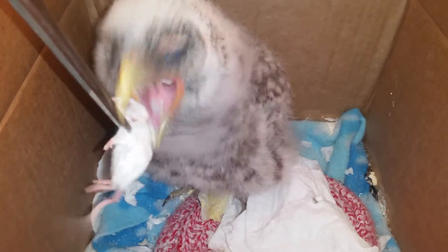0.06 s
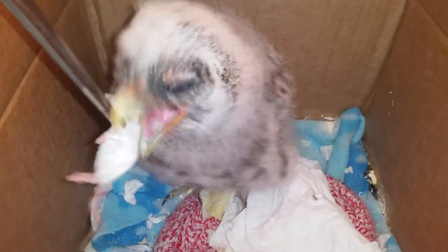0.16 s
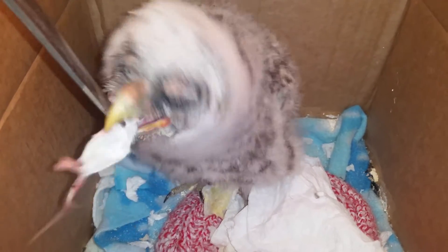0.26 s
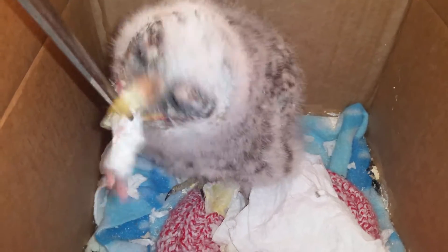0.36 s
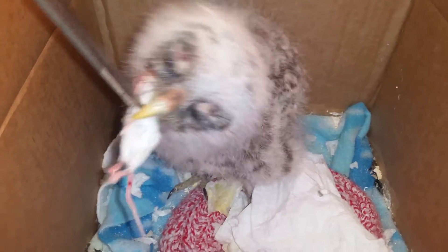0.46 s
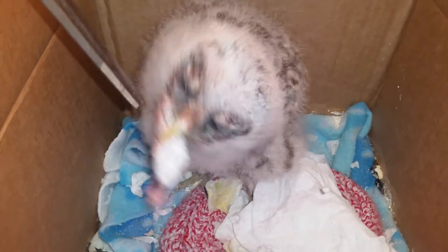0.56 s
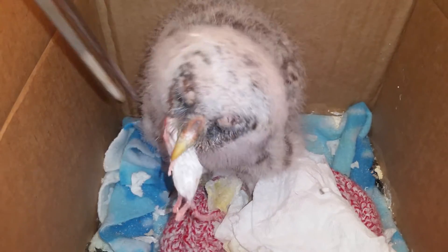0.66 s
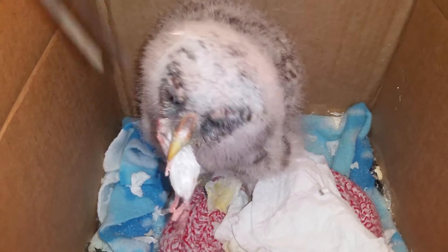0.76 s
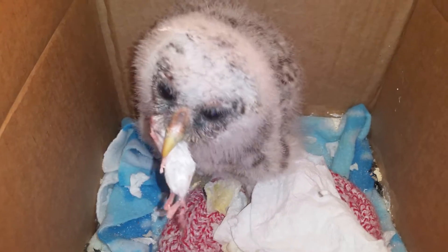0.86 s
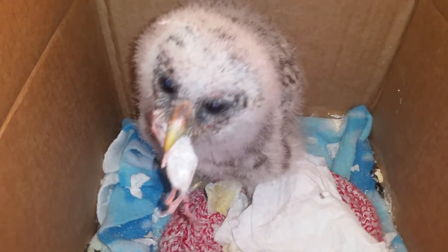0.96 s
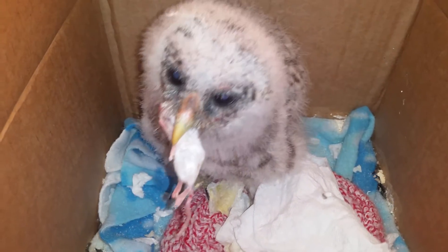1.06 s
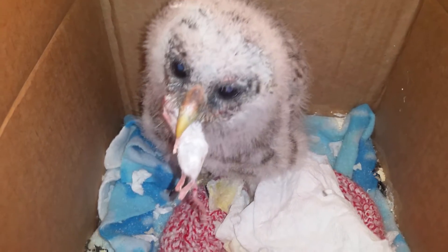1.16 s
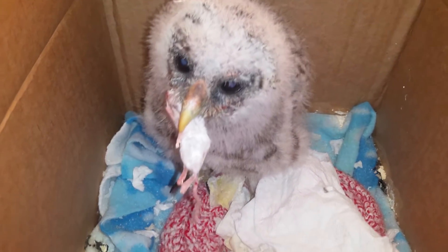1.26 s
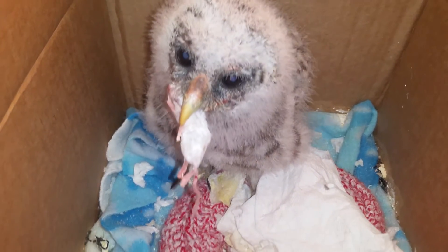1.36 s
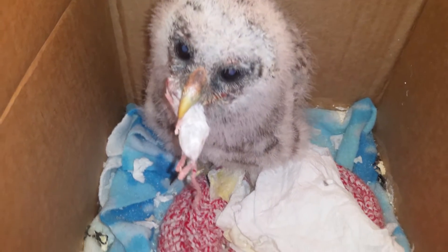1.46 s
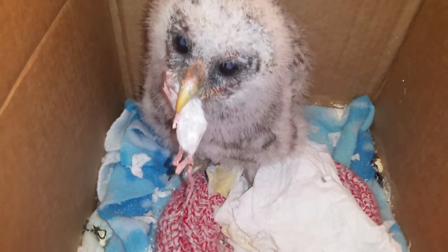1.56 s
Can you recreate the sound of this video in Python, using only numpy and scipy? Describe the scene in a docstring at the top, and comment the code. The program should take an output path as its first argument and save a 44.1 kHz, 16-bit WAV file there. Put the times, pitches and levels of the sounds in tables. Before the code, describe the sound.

One raspy, whistling owl chick screech in a quiet room, then bedding shuffles in its box

```python
"""A quiet room with a thin hiss; then an owl chick in a cardboard box gives one begging screech, close up.
The two sides of its syrinx are coupled oscillators: the lower flutters, then breaks into a rasp of
band-limited noise, while the upper climbs and falls away. Shaped noise hisses through the open beak.
Bumps ring the decaying modes of the box, and shuffling on the bedding is rustling noise over a low rumble."""
import sys
import numpy as np
from scipy import signal
from scipy.fft import rfft, irfft
from scipy.io import wavfile

SR = 44100
rng = np.random.default_rng(int(sys.argv[2]) if len(sys.argv) > 2 else 0)


def wav_out(sig):
    """Save sig, one row per channel (or a flat mono array), as 16-bit PCM at SR to the path in sys.argv[1]."""
    wavfile.write(sys.argv[1], SR, np.round(np.clip(np.atleast_2d(sig).T, -1, 1) * 32767).astype(np.int16))


N = 70560
T = np.arange(N) / SR
EDGE_S = 0.00076  # fade at each end of a gated layer


def undb(db):
    """Decibels to gain."""
    return 10 ** (np.asarray(db) / 20)


def unit(x):
    """Scale to rms 1."""
    return x / np.sqrt(np.mean(np.abs(x) ** 2))


def curves(table):
    """Each column after the time as a curve with straight lines between the rows."""
    rows = np.array(table, float)
    return [np.interp(T, rows[:, 0], column) for column in rows.T[1:]]


def gate(table):
    """Open from the first row of a table to the last, with soft edges."""
    opening = np.clip((T - table[0][0]) / EDGE_S + 1, 0, 1)
    closing = np.clip((table[-1][0] - T) / EDGE_S + 1, 0, 1)
    return opening * closing


def pan(x, left_right_db):
    """Place a sound by its left-right level difference, keeping its mean power."""
    gains = undb(np.array([[1], [-1]]) * left_right_db / 2)
    return x * gains / np.sqrt(np.mean(gains ** 2, axis=0))


def flicker(hz):
    """Complex noise of rms 1 whose spectrum falls steeply beyond a rate."""
    f = np.fft.fftfreq(N, 1 / SR)
    noise = rng.standard_normal(N) + 1j * rng.standard_normal(N)
    return unit(np.fft.ifft(np.fft.fft(noise) / (1 + (f / hz) ** 2) ** 1.435))


def walk(hz):
    """Random wandering with rms 1."""
    return unit(flicker(hz).real)


def spin(hz):
    """Complex oscillator that follows a pitch curve."""
    return np.exp(2j * np.pi * np.cumsum(hz + 0 * T) / SR)


def noise_band(hz, width_hz):
    """Flickering carrier: a band of noise around one pitch."""
    return spin(hz) * flicker(width_hz / 2)


def coloured(table, spread):
    """Stereo noise of rms 1 with a spectrum and a balance; spread is the unshared part."""
    hz, db, left_right_db = np.array(table, float).T
    log_f = np.log(np.maximum(np.fft.rfftfreq(N, 1 / SR), 1))
    mid, side = rng.standard_normal((2, N))
    spectrum = rfft(mid + spread * side * np.array([[1], [-1]]))
    spectrum = spectrum * undb(np.interp(log_f, np.log(hz), db))
    return unit(irfft(pan(spectrum, np.interp(log_f, np.log(hz), left_right_db)), N))


def resonate(x, hz, width_hz):
    """Pass a complex signal through one steep two-pole resonance."""
    f = np.fft.fftfreq(N, 1 / SR)
    return np.fft.ifft(np.fft.fft(x) / (1 + 1j * (f - hz) / width_hz) ** 2)


# Colour of the quiet room: pitch_hz, relative_level_db (per Hz), left_right_db
ROOM_COLOUR = [(20, -7, 0), (50, 2, -2), (130, -2, -2), (240, -4, 0), (330, -10, 0), (650, -10, 2),
               (1200, -22, 4), (2200, -34, 2), (6000, -48, 0), (15000, -54, 0)]
ROOM_DB, ROOM_SPREAD = -54, 0.48
WHISPER_HZ, WHISPER_WIDTH_HZ, WHISPER_DB, WHISPER_PAN_DB = 4100, 1000, -63.5, 18


def room():
    """Broad noise weighted to the lows, and a thin steady band of hiss, mostly left."""
    whisper = undb(WHISPER_DB) * unit(noise_band(WHISPER_HZ, WHISPER_WIDTH_HZ).real)
    return undb(ROOM_DB) * coloured(ROOM_COLOUR, ROOM_SPREAD) + pan(whisper, WHISPER_PAN_DB)


# Effort of the shuffling: time_s, rustle_level_db, rumble_level_db
SHUFFLE_LEVELS = [(.2, -60, -54), (.95, -51.5, -58), (1.08, -53, -47.5), (1.28, -52, -46),
                  (1.455, -49, -43), (1.474, -38.5, -42.5), (1.51, -42.5, -38.5), (1.54, -46.5, -45),
                  (1.572, -39.5, -47), (1.6, -45.5, -39)]
# Colour of the cloth rustle: pitch_hz, relative_level_db (per Hz), left_right_db
CLOTH_COLOUR = [(148, 2, -4.5), (680, 1.5, 2.5), (1140, -3, 6), (1350, -8, 0), (3160, -10, 1),
                (4420, -5.5, 9.5), (6100, -16, 7), (8570, -24, -0.5), (10200, -20.5, -6), (15500, -24, -1)]
RUMBLE_HZ, RUMBLE_WIDTH_HZ, RUMBLE_PAN_DB = 106.2, 130, -14.5
RUSTLE_PATCHY_DB = 1  # rms wander of the rustle's level


def shuffle():
    """Feet and down rub the bedding as patchy noise, and the floor of the box rumbles."""
    rustle_db, rumble_db = curves(SHUFFLE_LEVELS)
    rustle = coloured(CLOTH_COLOUR, 0.82) * undb(rustle_db + RUSTLE_PATCHY_DB * walk(160))
    rumble = unit(noise_band(RUMBLE_HZ, RUMBLE_WIDTH_HZ).real) * undb(rumble_db)
    return (rustle + pan(rumble, RUMBLE_PAN_DB)) * gate(SHUFFLE_LEVELS)


# Bumps against the box: start_s, level_db, brightness_db_per_decade (tilt around the second box mode)
BUMP_EVENTS = [(0.278, -35.5, -25), (0.486, -35, -18.5), (.548, -47.5, -48), (.826, -40.5, 10),
               (0.847, -32, 3), (1.334, -47.5, 7.5), (1.466, -35.5, -18)]
# Modes of the cardboard: pitch_hz, relative_level_db, t60_s
BOX_MODES = [(53.5, -14.5, 0.59), (128, -5, 0.37), (233.4, -2.5, 0.18)]
BUMP_PUSH_S, BUMP_ROUGH = 0.0052, 0.52  # build-up of the ring, scrape in the ring
KNOCK_HZ, KNOCK_WIDTH_HZ, KNOCK_S, KNOCK_DB = 480, 850, .004, -2


def bumps():
    """Soft, scraping pushes ring the cardboard modes, each with a broad knock at contact."""
    out = np.zeros(N)
    for start, db, bright_db in BUMP_EVENTS:
        age = np.maximum(T - start, 0)
        tilt_db = lambda hz: bright_db * np.log10(hz / BOX_MODES[1][0])
        for hz, mode_db, t60 in BOX_MODES:
            ring = (1 - np.exp(-age / BUMP_PUSH_S)) * np.exp(-np.log(1000) * age / t60)
            scrape = (spin(hz) * (1 + BUMP_ROUGH * flicker(40))).real
            out += undb(db + mode_db + tilt_db(hz)) * ring * scrape
        contact = age / KNOCK_S * np.exp(1 - age / KNOCK_S)
        knock = noise_band(KNOCK_HZ, KNOCK_WIDTH_HZ).real
        out += undb(db + KNOCK_DB + tilt_db(KNOCK_HZ)) * contact * knock
    return pan(out, 0)


# Between these times the whistles grow unsteady and the rasp frays from a strand to a wide band
BREAK_S, HOARSE_S = .53, .82


def hoarseness():
    """Strain on the voice, rising from 0 at the break to 1."""
    return np.interp(T, [BREAK_S, HOARSE_S], [0, 1])


JITTER_HZ, HOARSE_JITTER_HZ = 15.74, 32  # rms pitch wander, and the extra when fully hoarse
ROUGH_WIDTH_HZ = 140


def whistle(hz, roughness):
    """One side of the syrinx: a wandering tone whose amplitude and phase are roughened by noise."""
    wander_hz = (JITTER_HZ + hoarseness() * HOARSE_JITTER_HZ) * walk(137.7)
    rough = (1 + roughness * flicker(ROUGH_WIDTH_HZ)) / np.sqrt(1 + roughness ** 2)
    return spin(hz + wander_hz) * rough


FLUTTER_BELOW, FLUTTER_SECOND, FLUTTER_JITTER = .1, .15, .04  # lower and second sidebands, rate wander
FLUTTER_DRIVE = .52


def flutter(rate_hz, depth):
    """Uneven sidebands swing the tone, and saturation makes flat swells and sharp dips."""
    beat = spin(rate_hz * (1 + FLUTTER_JITTER * walk(120)))
    sidebands = beat - FLUTTER_BELOW * 1j / beat + FLUTTER_SECOND * depth * 1j * beat ** 2
    swing = 1 + depth * sidebands
    saturation = np.sqrt((1 + FLUTTER_DRIVE ** 2) / (1 + np.abs(FLUTTER_DRIVE * swing) ** 2))
    return beat, swing * saturation


# Moments when the lower voice catches as it breaks: time_s
CATCH_TIMES = [.4685, .482, .511, .5165, .521]
CATCH_DEPTH, CATCH_S = .8, .0007  # depth as a fraction, half-width of the dip


def catches():
    """Each catch chokes the lower voice for a moment."""
    return np.prod([1 - CATCH_DEPTH / (1 + ((T - at) / CATCH_S) ** 2) for at in CATCH_TIMES], axis=0)


# Lower voice: time_s, pitch_hz, level_db (before flutter and catches)
LOWER_VOICE = [(.202, 4153, -54), (.205, 4145, -31), (.211, 4186, -36), (.215, 4120, -19),
               (.248, 4320, -20), (.281, 4396, -23), (.307, 4243, -17.5), (.337, 4032, -19.5),
               (.371, 4090, -17), (.392, 4223, -16), (.425, 4200, -18.5), (.47, 4256, -12.8),
               (.493, 4135, -15.5), (.506, 4210, -13.8), (.514, 4340, -15), (.521, 4500, -25),
               (.536, 4763, -33), (.59, 4800, -32), (.67, 4950, -37), (.725, 4800, -29), (.765, 5024, -32),
               (.88, 5038, -41), (.94, 4900, -30), (.955, 4424, -28), (.971, 4000, -46)]
# Its flutter and roughness: time_s, flutter_rate_hz, flutter_depth (ratio), roughness (noise-to-tone ratio)
LOWER_FLUTTER = [(.226, 250, 0, .01), (.233, 255, .7, .02), (.29, 265, .48, .03), (.335, 440, .6, .05),
                 (.375, 300, .7, .04), (.392, 220, .55, .04), (.43, 330, .38, .02), (.462, 240, .6, .05),
                 (.469, 130, .03, .04), (.505, 0, 0, .02), (.53, 0, 0, .2), (.72, 0, 0, .35),
                 (.8, 0, 0, 1.3), (.96, 0, 0, .7)]


def lower_voice():
    """The lower whistle flutters, catches and roughens; returns the beat, bare wave and levelled wave."""
    hz, db = curves(LOWER_VOICE)
    rate_hz, depth, roughness = curves(LOWER_FLUTTER)
    beat, fluttering = flutter(rate_hz, depth)
    wave = whistle(hz, roughness) * fluttering * catches() * gate(LOWER_VOICE)
    return beat, wave, undb(db) * wave


# Upper voice: time_s, pitch_hz, level_db
UPPER_VOICE = [(.222, 5450, -60), (.231, 5500, -35), (.245, 5630, -33), (.28, 5620, -34), (.305, 5440, -28),
               (.35, 5310, -28), (.405, 5470, -27), (.432, 5240, -37), (.478, 5386, -25.5),
               (.565, 5320, -28), (.592, 5426, -22), (.636, 5564, -20), (.678, 5970, -23),
               (.708, 6010, -26), (.728, 5860, -29), (.784, 5925, -27), (.83, 6050, -35), (.865, 6120, -27),
               (.91, 6260, -21.5), (.93, 6130, -28), (.95, 5700, -33), (.969, 5050, -42)]
# Side tone that splits off the upper voice: time_s, pitch_hz, level_db
UPPER_SIDE_TONE = [(.64, 6240, -36), (.68, 6540, -30.5), (.712, 6620, -28.5), (.735, 6480, -30.5),
                   (.77, 6480, -30), (.83, 6710, -35), (.92, 6440, -36)]
HIGH_ROUGH, HIGH_ROUGH_LATE = .06, 0.32  # noise-to-tone ratio before the break and when hoarse


def upper_voice():
    """The upper whistle and its side tone roughen together; returns bare wave, levelled wave, side tone."""
    hz, db = curves(UPPER_VOICE)
    side_hz, side_db = curves(UPPER_SIDE_TONE)
    roughness = HIGH_ROUGH + hoarseness() * (HIGH_ROUGH_LATE - HIGH_ROUGH)
    wave = whistle(hz, roughness) * gate(UPPER_VOICE)
    side = undb(side_db) * whistle(side_hz, roughness) * gate(UPPER_SIDE_TONE)
    return wave, undb(db) * wave, side


# Overtones: time_s, upper_octave_level_db, sum_tone_level_db
OVERTONE_LEVELS = [(.222, -60, -60), (.24, -44, -43), (.28, -41, -39), (.34, -46, -45), (.4, -44, -42),
                   (.44, -53, -52), (.5, -51, -44), (.6, -53, -54), (.68, -43, -52), (.8, -38, -52),
                   (.94, -38, -51), (.968, -49, -58)]
TREBLE_PAN_DB = -10


def overtones(low_wave, high_wave):
    """Products of the whistles give the upper voice's octave and the sum of both voices."""
    octave_db, sum_db = curves(OVERTONE_LEVELS)
    treble = high_wave * (undb(sum_db) * low_wave + undb(octave_db) * high_wave)
    return pan(treble, TREBLE_PAN_DB)


STRAND_WIDTH_HZ, RASP_WIDTH_HZ = 380, 1150


def throat_rasp(throat_hz, rasp_db, grain):
    """Air through the throat: a narrow strand of noise that frays to a wide band."""
    hoarse = hoarseness()
    strand = np.sqrt(1 - hoarse) * flicker(STRAND_WIDTH_HZ / 2)
    wide = np.sqrt(hoarse) * flicker(RASP_WIDTH_HZ / 2)
    return undb(rasp_db) * grain * spin(throat_hz) * (strand + wide)


# Ring of the beak around the break: time_s, level_db
BEAK_LEVEL = [(.495, -90), (.515, -44), (.64, -48), (.74, -64), (.96, -90)]
# Resonances of the beak: pitch_hz, left_right_db
BEAK_RESONANCES = [(2200, -23), (2820, -2.5)]
BEAK_WIDTH_HZ = 300


def beak_ring(grain):
    """Turbulent air excites two narrow resonances of the beak."""
    level_db, = curves(BEAK_LEVEL)
    ring = sum(pan(noise_band(hz, BEAK_WIDTH_HZ), lr_db) for hz, lr_db in BEAK_RESONANCES)
    return undb(level_db) * grain * ring


MOUTH_HZ, MOUTH_WIDTH_HZ, MOUTH_DB = 1060, 270, -18  # level is relative to the hiss
DIFFERENCE_DB = -54


def open_mouth(low_wave, high_wave, hiss_db, grain):
    """The mouth cavity rings with the voices' difference tone and with a band of breath."""
    difference = resonate(high_wave * low_wave.conj(), MOUTH_HZ, MOUTH_WIDTH_HZ)
    breath = undb(hiss_db + MOUTH_DB) * grain * noise_band(MOUTH_HZ, MOUTH_WIDTH_HZ)
    return undb(DIFFERENCE_DB) * difference + breath


# Colour of the open-beak hiss: pitch_hz, relative_level_db (per Hz), left_right_db
HISS_COLOUR = [(253, -8, 1.5), (950, -5, 2), (1530, -11, 3.5), (2240, -2.5, -1.5), (2710, -8, 1),
               (3190, 0, -0.5), (4760, 1.5, -20), (6030, 7, 24), (6500, -1.5, 7), (8600, -4, 1),
               (10250, -4.5, -3), (11700, 0, -10.5), (13000, -11, 7), (15500, -8, -21)]
HISS_SPREAD = 0.98


def beak_hiss(hiss_db, grain):
    """Broad turbulent air through the open beak."""
    return undb(hiss_db) * grain * coloured(HISS_COLOUR, HISS_SPREAD)


# Air through the throat: time_s, resonance_hz, rasp_level_db, hiss_level_db
THROAT_AIR = [(.215, 4300, -62, -61), (.24, 4310, -48, -48), (.39, 4250, -39, -43), (.44, 4280, -46, -43),
              (.5, 4300, -41, -40), (.522, 4330, -22, -35), (.54, 4320, -28, -33.5), (.6, 4380, -28, -36.5),
              (.66, 4600, -31, -31.5), (.76, 4950, -31.5, -34.5), (.85, 4900, -30.5, -31),
              (.92, 5015, -31, -32.5), (.95, 4920, -28, -35.5), (.968, 4500, -47, -57),
              (.985, 4200, -72, -82)]
# The head turns: time_s, lower_left_right_db, upper_left_right_db
HEAD_TURN = [(.22, 6.5, 10), (.29, 9, 17), (.335, -0.5, 13), (.42, -3.5, 13), (.5, -5.5, 11), (.55, -3, 16),
             (.6, 9, 18), (.68, 11, 12), (.74, 3, 7.2), (.84, 2.5, 3.6), (.92, 2.5, 5.7)]
RASP_PATCHY_DB, RASP_GRAIN_HZ = 2, 220  # rms wander of the air's level, and its rate
UNDER_DB, OVER_DB = -17, -23  # coupling tones below and above the pair
DOUBLE_LOW_DB, DOUBLE_LOW_PAN_DB = -15.5, 21
PORT_LAG_S = .000028  # the right side hears the screech later


def screech():
    """Two coupled whistles, their combination tones and turbulent air leave a turning head."""
    throat_hz, rasp_db, hiss_db = curves(THROAT_AIR)
    low_pan, high_pan = curves(HEAD_TURN)
    grain = undb(RASP_PATCHY_DB * walk(RASP_GRAIN_HZ)) * gate(THROAT_AIR)
    beat, low_wave, low = lower_voice()
    high_wave, high, side = upper_voice()
    under = undb(UNDER_DB) * low ** 2 * high_wave.conj()
    # the extra beat sets this tone lower by the flutter rate
    over = undb(OVER_DB) * high * high_wave * (low_wave * beat).conj()
    tones = pan(low + throat_rasp(throat_hz, rasp_db, grain) + under, low_pan)
    tones = tones + pan(high + side + over, high_pan)
    tones = tones + beak_ring(grain) + open_mouth(low_wave, high_wave, hiss_db, grain)
    tones = tones + pan(undb(DOUBLE_LOW_DB) * low ** 2, DOUBLE_LOW_PAN_DB)  # octave of the lower voice
    tones = tones + overtones(low_wave, high_wave)
    left, right = np.sqrt(2) * tones.real + beak_hiss(hiss_db, grain)
    lag = np.exp(-2j * np.pi * np.fft.rfftfreq(N, 1 / SR) * PORT_LAG_S)
    return np.array([left, irfft(rfft(right) * lag, N)])


ECHO_DB, ECHO_T60_S = -25.5, 0.26


def echo(x):
    """The box and the room answer with a faint tail of decaying noise."""
    tail = rng.standard_normal((2, N)) * np.exp(-np.log(1000) * T / ECHO_T60_S)
    tail /= np.sqrt(np.sum(tail ** 2, axis=1, keepdims=True))
    return x + undb(ECHO_DB) * signal.fftconvolve(x, tail, axes=1)[:, :N]


def scene():
    """The room, the shuffling, the bumps, and the screech with its echo."""
    return room() + shuffle() + bumps() + echo(screech())


TOP_HZ = 15850


def record(dry):
    """A steep low-pass cuts the top."""
    return signal.sosfilt(signal.ellip(10, .2, 80, TOP_HZ, fs=SR, output="sos"), dry)


dry = scene()
out = record(dry)
wav_out(out)
```